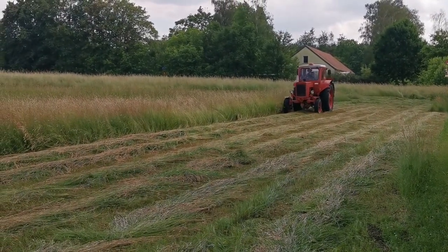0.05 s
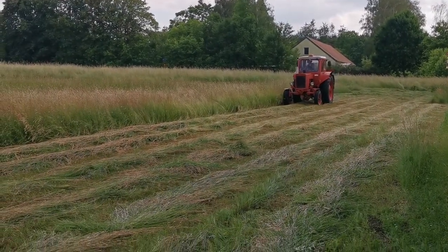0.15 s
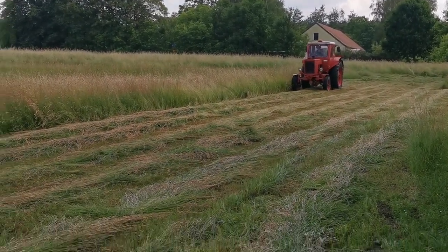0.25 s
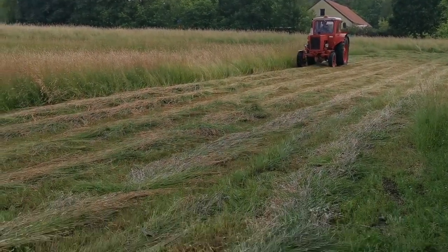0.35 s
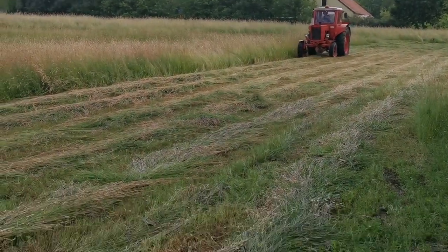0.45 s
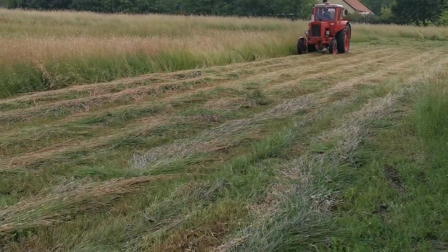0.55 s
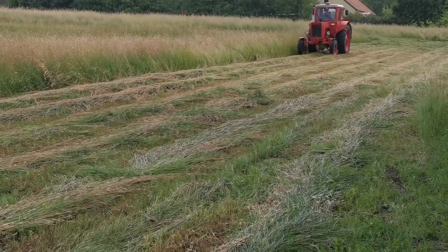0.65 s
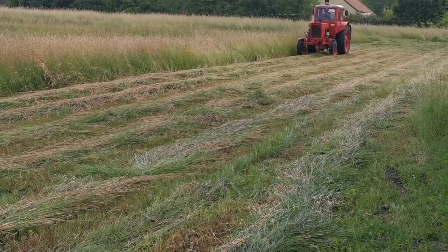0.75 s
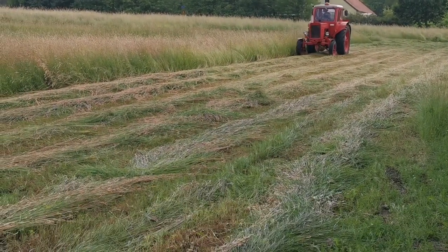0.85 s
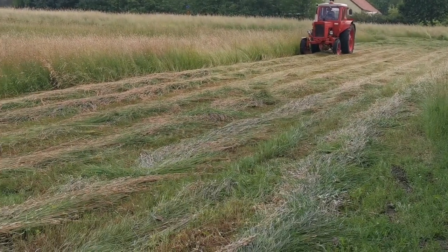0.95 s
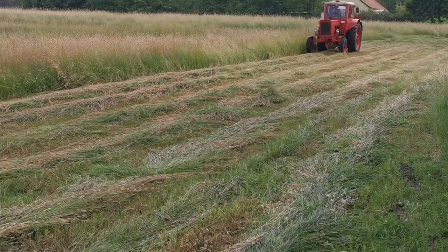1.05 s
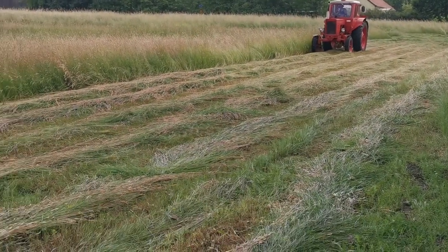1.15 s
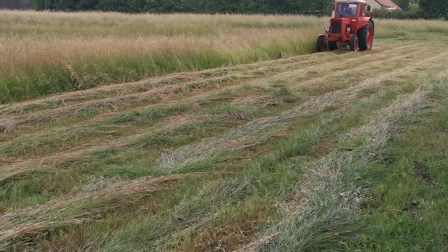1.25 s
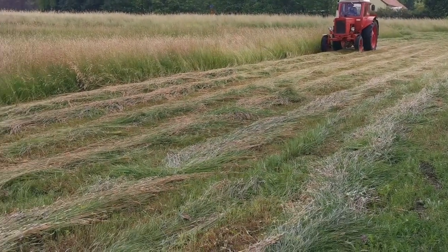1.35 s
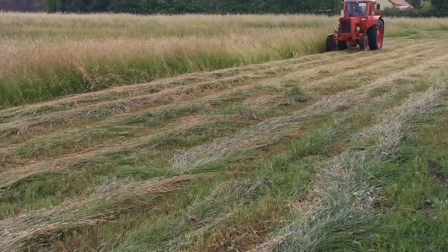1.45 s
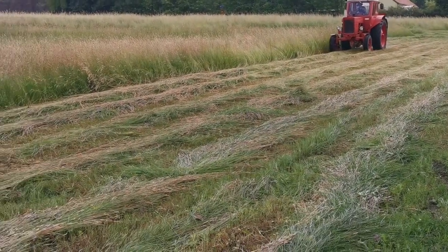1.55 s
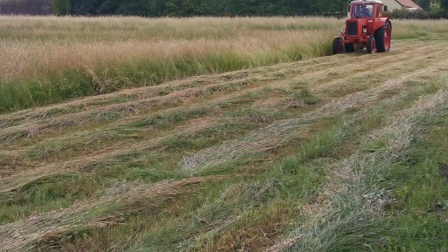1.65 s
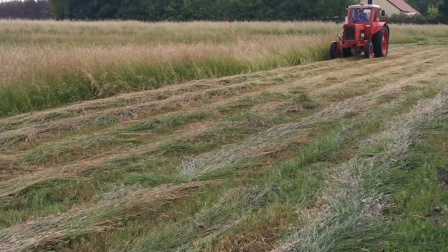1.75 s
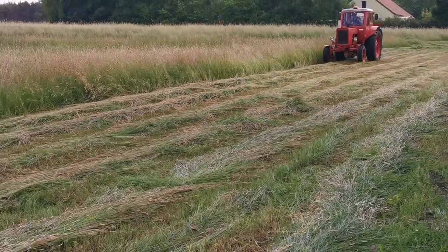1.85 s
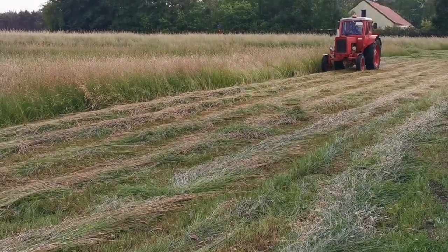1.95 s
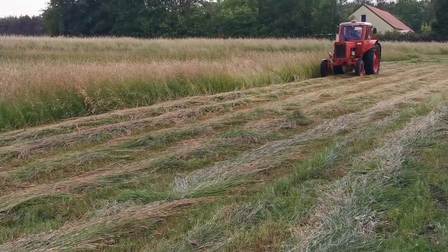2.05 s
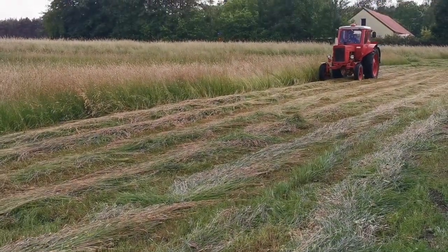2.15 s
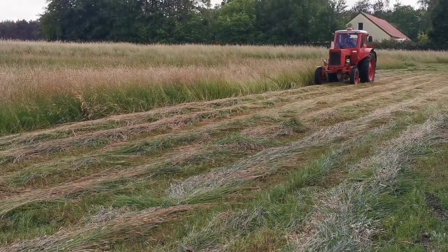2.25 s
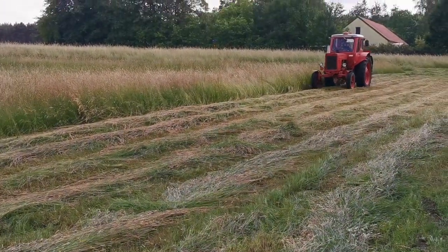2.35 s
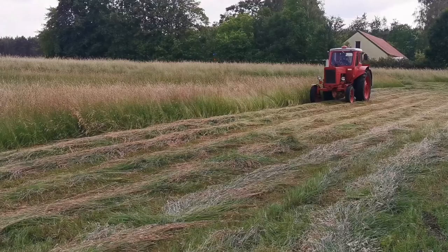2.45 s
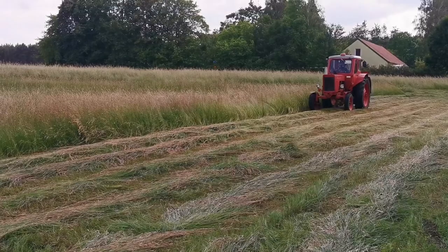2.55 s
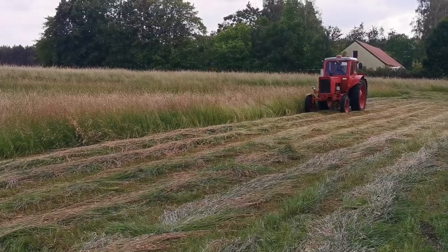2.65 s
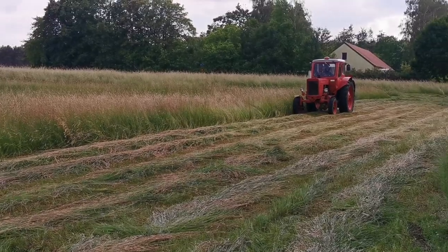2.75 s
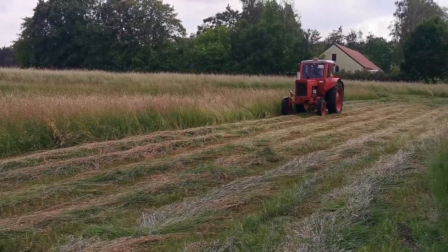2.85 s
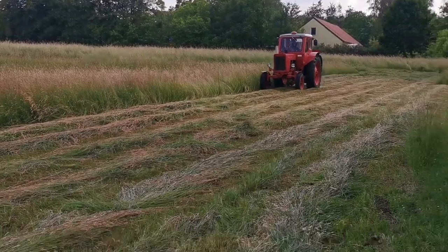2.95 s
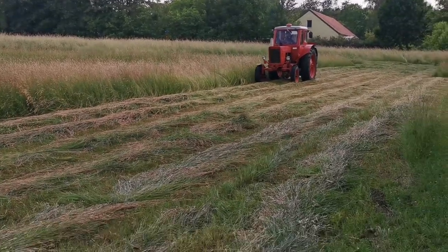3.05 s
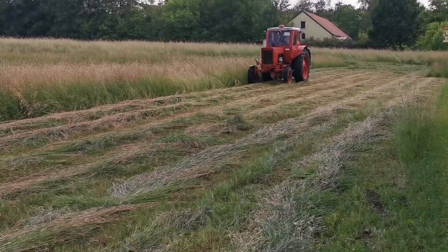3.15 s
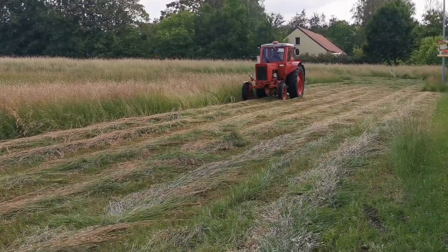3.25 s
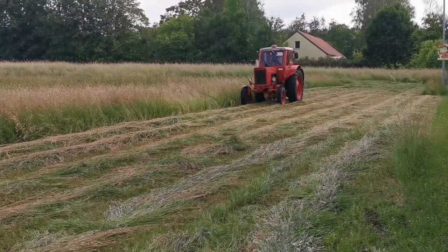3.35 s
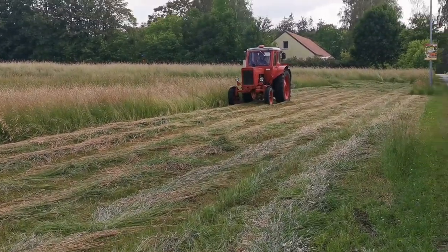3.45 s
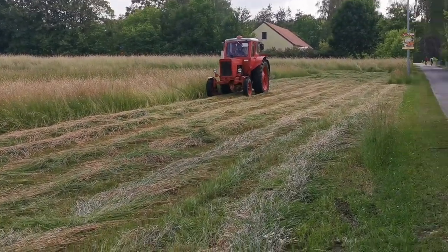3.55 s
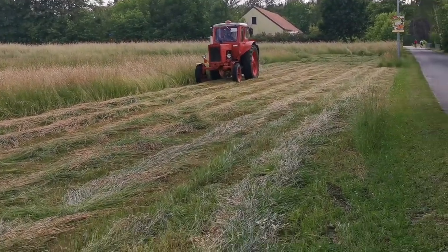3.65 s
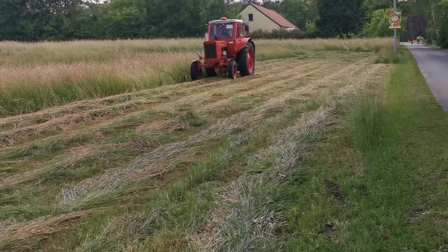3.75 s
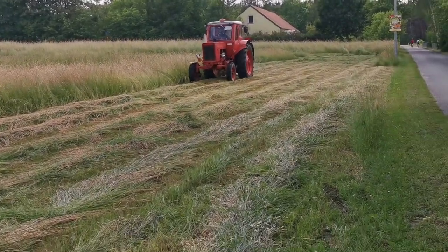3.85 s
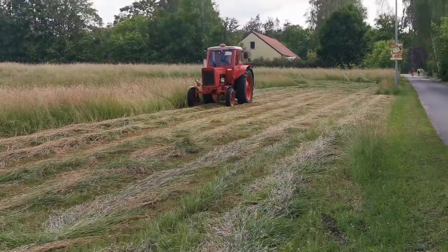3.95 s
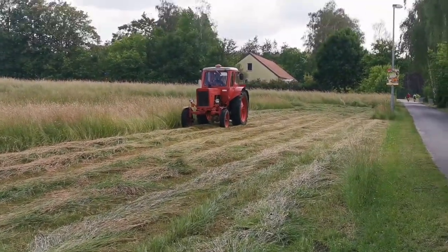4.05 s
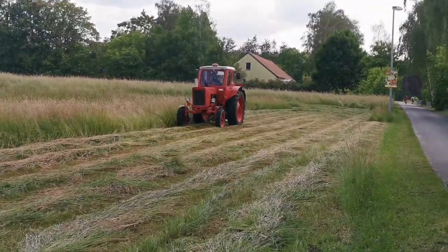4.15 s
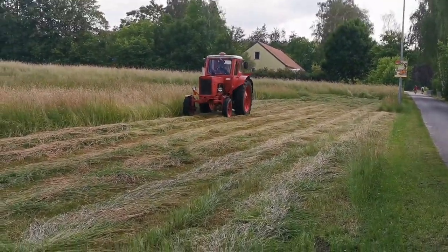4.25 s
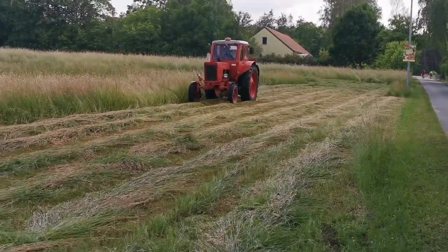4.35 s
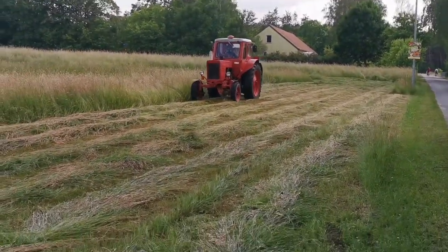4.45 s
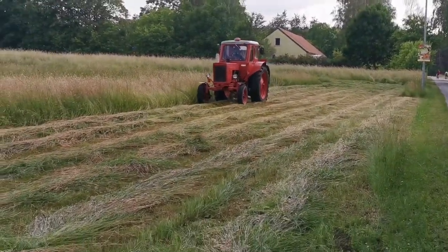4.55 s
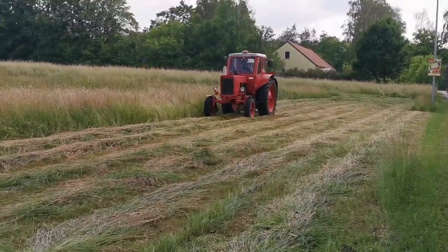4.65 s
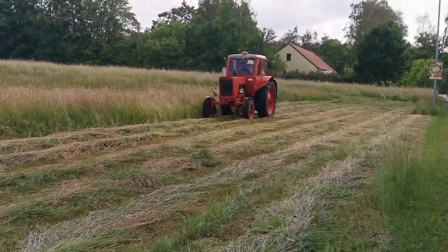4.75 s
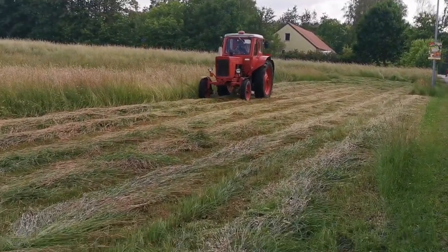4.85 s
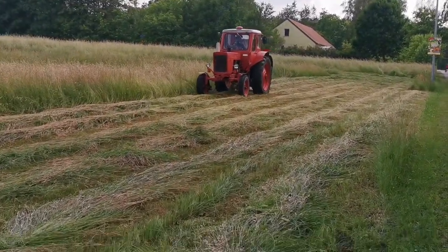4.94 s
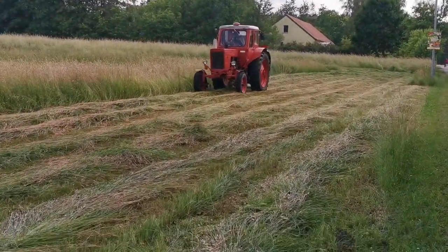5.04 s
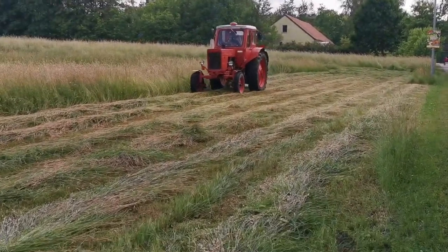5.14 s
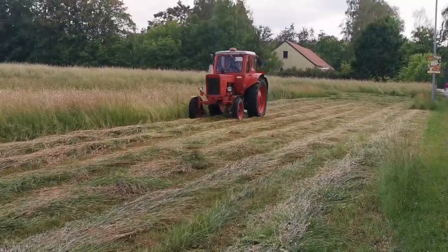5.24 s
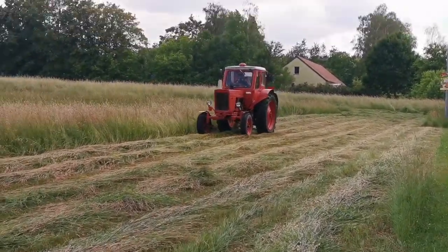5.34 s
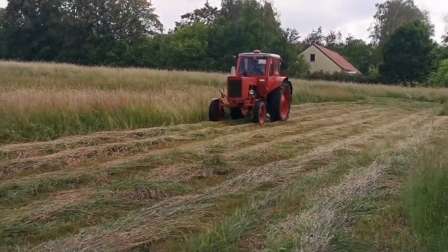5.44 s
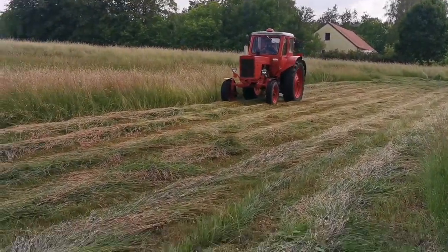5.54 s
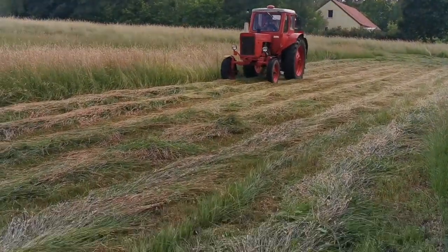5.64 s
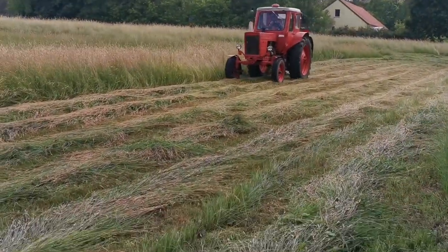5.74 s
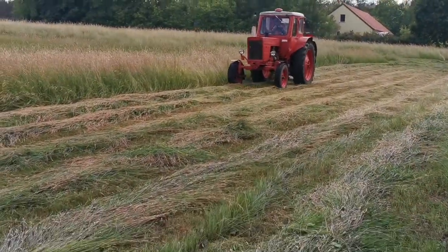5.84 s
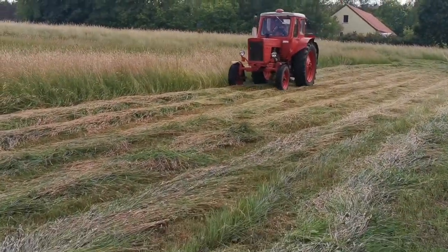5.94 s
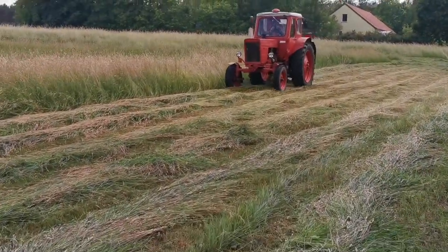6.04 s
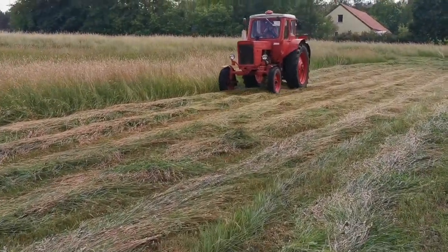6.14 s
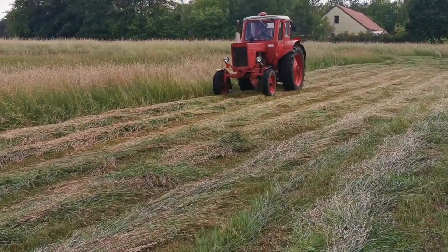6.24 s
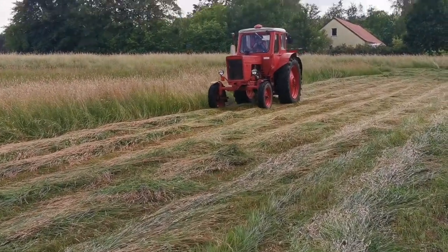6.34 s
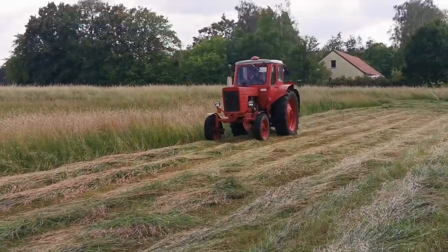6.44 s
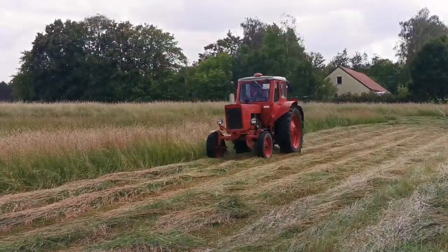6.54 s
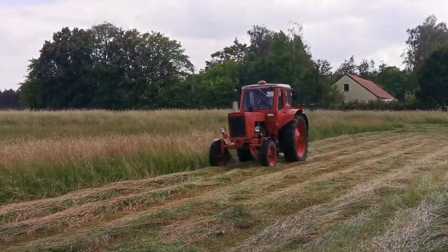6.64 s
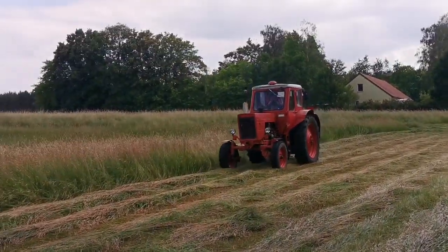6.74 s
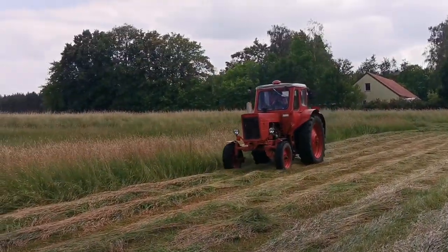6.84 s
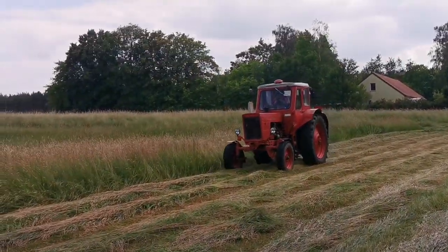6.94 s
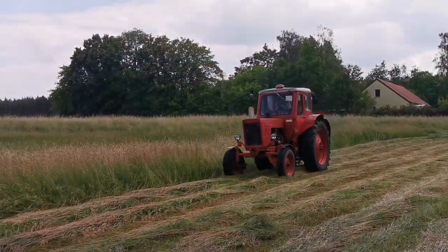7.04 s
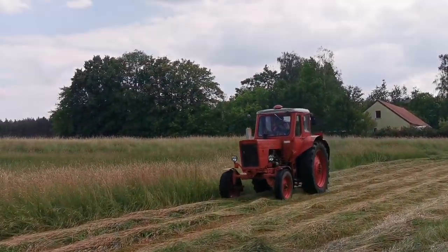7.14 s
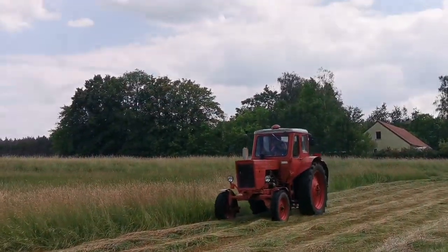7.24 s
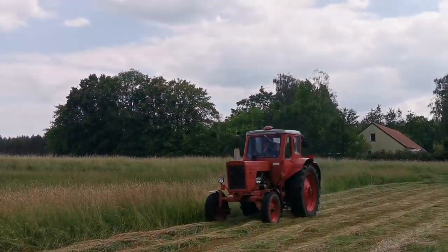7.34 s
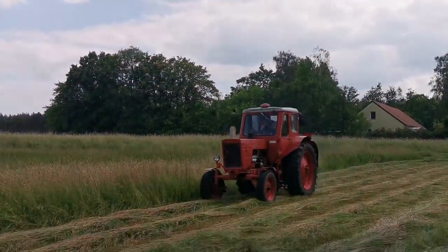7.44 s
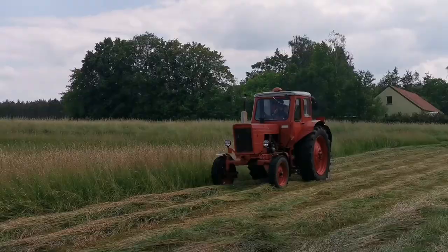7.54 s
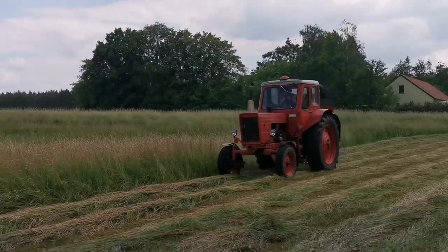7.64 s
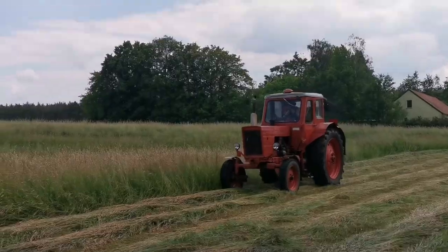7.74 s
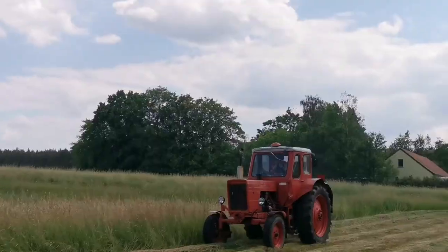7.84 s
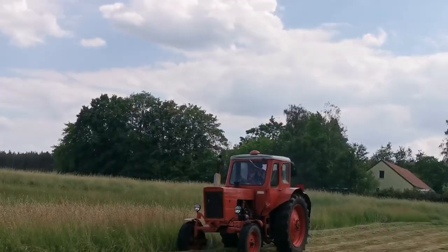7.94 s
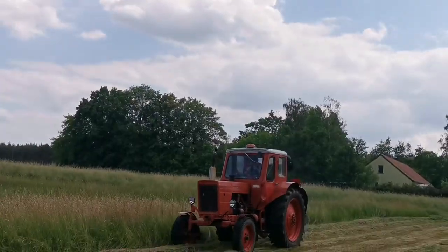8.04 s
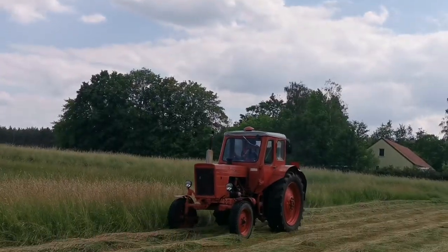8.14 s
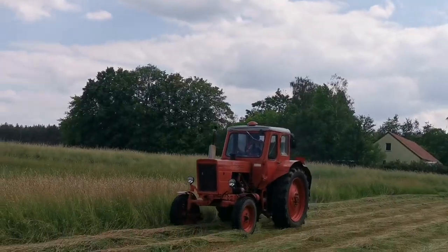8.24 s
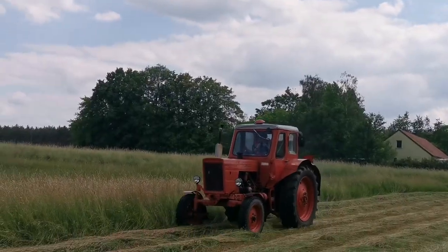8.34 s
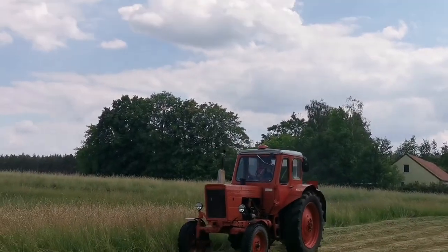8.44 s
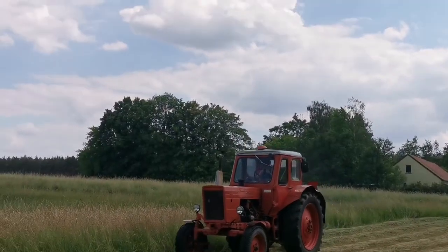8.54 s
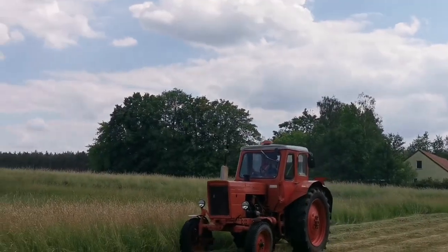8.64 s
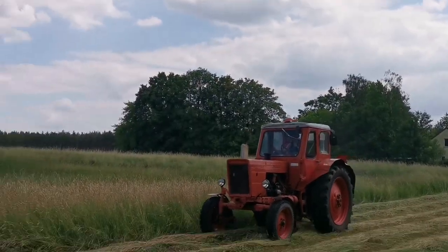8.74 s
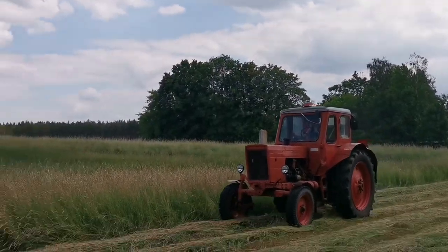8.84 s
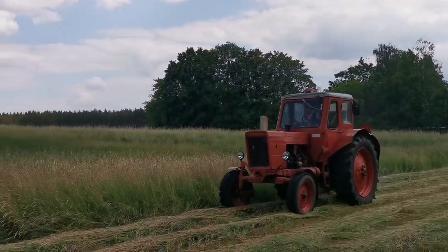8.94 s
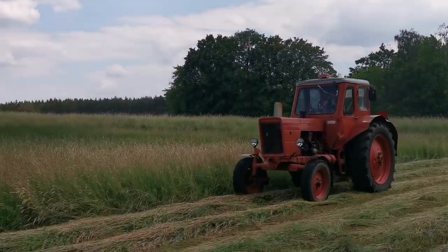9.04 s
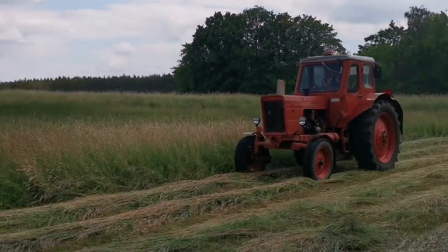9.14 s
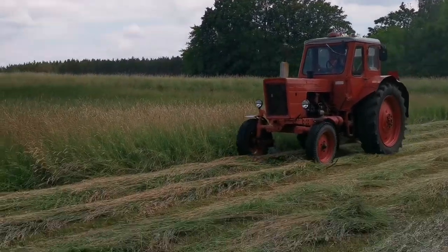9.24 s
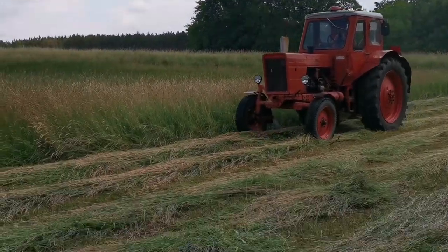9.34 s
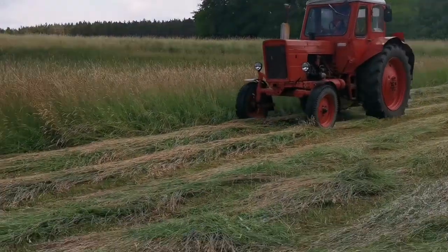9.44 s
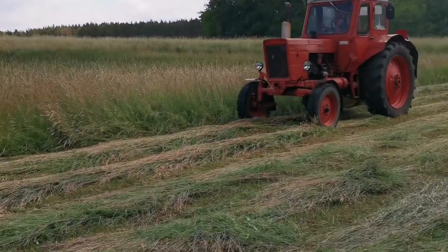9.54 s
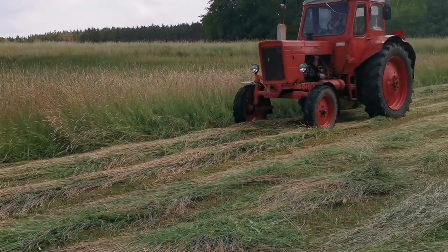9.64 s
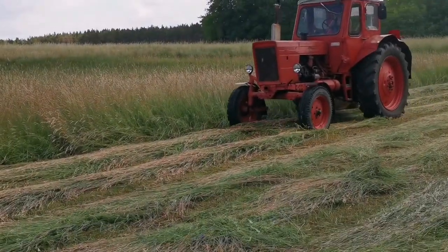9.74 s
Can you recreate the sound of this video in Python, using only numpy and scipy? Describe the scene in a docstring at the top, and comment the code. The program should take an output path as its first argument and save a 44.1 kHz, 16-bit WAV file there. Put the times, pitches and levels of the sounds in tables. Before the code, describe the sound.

An old four-cylinder diesel is already running and comes steadily nearer over mown grass. Low exhaust drone and gassy rumble dominate, with uneven knocking from the engine block, thin gear tones and two unsteady hums from the rotary mower. Airy hiss pulses with the knocks. Occasional millisecond crackles of stalks or grit cluster around seven seconds. Dry open air, handheld stereo microphone at the field edge, tone shifting as it turns, loudest at the end.

```python
"""Hay field: a four-cylinder diesel tractor with a rotary mower drives towards two microphone ports.
Exhaust: harmonics of the firing rate over a noise rumble. Block: patchy noise, struck modes, gear whines.
Fan and cut grass: patchy hiss that flares at each knock. Snapping stalks: short noise cracks.
Mower drive: two hums. The ports turn to follow, so block and hiss change colour with approach and bearing."""
import sys
import numpy as np
from scipy import signal
from scipy.fft import rfft, irfft, next_fast_len
from scipy.io import wavfile
from scipy.ndimage import uniform_filter1d, map_coordinates

SR = 44100
rng = np.random.default_rng(int(sys.argv[2]) if len(sys.argv) > 2 else 0)


def to_wav(sig):
    """Store sig (one row per channel, or 1-D mono) as 16-bit WAV at the path in sys.argv[1].

    Samples outside -1..1 are clipped; the rate is SR.
    """
    pcm = np.clip(np.atleast_2d(sig), -1, 1) * 32767
    pcm = np.round(pcm).astype(np.int16)
    wavfile.write(sys.argv[1], SR, pcm.T)  # frames by channels


N = 431738

# Firing rate as heard, dipping under load and falling as the tractor draws close: time_s, firing_hz
FIRING_RATE = [(0.0, 55.93), (1.29, 55.67), (2.38, 55.68), (2.76, 55.39), (4.45, 55.84), (5.74, 55.8),
               (6.03, 55.84), (8.01, 55.54), (8.4, 55.63), (9.79, 55.34)]
# Exhaust tones at 10 m: time_s, firing_level_db, octave_level_db
EXHAUST_10M = [(0, -28, -26), (.85, -27.5, -27), (2.3, -28.5, -25.5), (2.95, -26, -27), (4.0, -29.5, -26.5),
               (4.7, -30, -28), (6.0, -29.5, -28.5), (6.7, -31, -23.5), (6.95, -30, -29.5), (7.9, -28, -26),
               (8.4, -30, -29), (9.3, -29.5, -26.5), (9.79, -30.5, -27.5)]
# Weaker cycle harmonics from unequal cylinders: cycle_multiple, level_re_firing_db
UNEVEN_CYLINDERS = [(2, -21), (3, -19), (5, -16), (6, -13.5), (7, -18), (9, -18), (10, -15), (11, -16),
                    (13, -25), (14, -22), (15, -21), (17, -21), (18, -25), (19, -24)]
# Gas rumble spectrum in the stack: frequency_hz, gain_db
STACK_RUMBLE = [(15, -36), (30, -19), (60, -4.5), (120, -3), (190, 1.5), (260, -1.5), (320, -20),
                (400, -29.5)]
# Block and hiss noise at 10 m: time_s, clatter_level_db, hiss_level_db
NOISE_10M = [(0, -26, -36.5), (1.25, -26.5, -35), (1.5, -27, -37), (1.8, -26, -34.5), (2.25, -25, -38),
             (2.45, -25, -38.5), (2.9, -25.5, -39), (3.2, -25, -37), (3.8, -25.5, -35.5), (4.5, -25, -33),
             (5.5, -24.5, -35), (6.45, -25.5, -35), (6.75, -25, -34.5), (6.9, -26.5, -36.5),
             (7.5, -25, -33.5), (8.1, -25, -35), (8.5, -28.5, -32.5), (9.1, -26.5, -36), (9.79, -28, -36.5)]
# Block modes: mode_hz, width_hz, level_re_noise_db, strength_cyl_1, .._2, .._3, .._4
BLOCK_MODES = [(480, 140, -27, .8, .4, .7, .9), (800, 130, -23, .5, .2, .8, .9),
               (950, 130, -24, .5, .3, .9, .5), (1180, 80, -21, .3, .4, 1.1, .4),
               (1480, 80, -22, .3, 1.1, .6, .7), (2080, 200, -20, .25, .7, 1.1, .45),
               (2500, 250, -24.5, .4, .7, .9, .5)]
# Gear whines at 55.7 Hz firing: pitch_hz, wander_hz, level_re_block_noise_db
GEARS = [(426, 2.55, -28.5), (554, 3.8, -33), (737.4, 6.22, -30), (861.5, 5.05, -26.5), (1354, 3.25, -32)]
# Stalk snaps and flung grit: start_s, peak_db (before colouring)
SNAPS = [(2.2977, -37), (3.1608, -29), (5.2244, -29), (5.3837, -33), (5.7867, -26), (5.9953, -24),
         (6.4398, -24), (6.8279, -19), (6.8374, -28), (6.8463, -26), (7.2903, -30), (7.3477, -18),
         (7.3946, -27), (7.4635, -20), (7.6194, -35), (8.5704, -32), (9.036, -21)]
# Snap spectrum: frequency_hz, gain_db
SNAP_COLOUR = [(2000, -50), (6500, -12), (9000, 3), (11000, 7), (13000, -2), (16000, -10)]
# Mower drive hums at 55.7 Hz firing: low_pitch_hz, high_pitch_hz
MOWER_HZ = (185.7, 272.0)
# Lower hum at 10 m: time_s, level_db
LOW_HUM_10M = [(0, -34), (1, -38), (2.8, -35), (4, -36), (5.1, -40), (5.45, -33.5), (6.3, -37.5),
               (7.3, -39.5), (8.4, -40.5), (9.1, -35), (9.79, -36.5)]
# Upper hum at 10 m, wavering and nearly dropping out: time_s, level_db
HIGH_HUM_10M = [(0, -46), (.25, -36), (.55, -49), (.85, -38), (1.1, -51), (1.4, -42), (1.75, -44.5),
                (2.05, -38.5), (2.47, -55), (2.65, -37), (3.05, -37.5), (3.25, -47), (3.5, -37),
                (4.5, -44.5), (5.35, -38.5), (6.5, -45.5), (7.3, -44), (7.7, -58), (8.1, -43.5),
                (9.0, -40.5), (9.25, -44), (9.79, -40)]
# Tractor path: time_s, approach_0_to_4 (block colour), bearing_0_to_4 (hiss colour)
PATH = [(0, 0, 0), (2.4, .1, .05), (2.9, .9, .9), (3.45, 1.1, 1.1), (3.8, 1.9, 1.9), (5.7, 2.1, 2),
        (6.6, 2.9, 2), (7.88, 3, 2), (8.03, 3.05, 2.95), (8.5, 3.2, 3), (9.1, 3.9, 3.1), (9.35, 3.95, 3.9),
        (9.79, 4, 4)]
# Block colours, far to alongside, shaped by ground echo and side-on view:
# frequency_hz, left_gain_db, right_gain_db
BLOCK_FAR = [(300, -8, -6.5), (354, -14, -20), (498, -15.5, -10.5), (654, -7.5, -1), (835, -3.5, -0.5),
             (932, 1, 1), (1050, -2.5, -11), (1170, -15, -6.5), (1390, -10, 3.5), (1460, 3, -2.5),
             (1740, -14, 0.5), (2050, -9, -2), (2280, -10, -2), (2844, -11.5, -6.5)]
BLOCK_COMING = [(300, -5, -4), (364, -20, -24), (500, -13, -8), (645, -8, -0.5), (800, -5.5, -0.5),
                (920, 3, 2.5), (1080, -6, -7), (1190, -14, -7), (1370, -15, 0), (1460, 5, 0.5),
                (1700, -18, -0.5), (1980, -2, -4), (2310, -14, 1), (2820, -10, -7)]
BLOCK_NEARING = [(300.7, -7.5, -7), (355, -19.5, -23), (495, -11, -6.5), (656, -6.5, -1.5), (800, -7, -1),
                 (940, -5, -7), (1070, -17, -7.5), (1230, -5.5, -4), (1400, -8.5, -0.5), (1490, -1.5, -0.5),
                 (1710, -10.5, -12), (1930, -7, 2), (2230, -2.5, -1), (3010, -26, -14)]
BLOCK_CLOSE = [(300, -6, -4), (367, -9, -12.5), (508, -4.5, 0.5), (660, 1, 6), (810, 1, 3), (986, -7.5, -5),
               (1070, -1.5, -10), (1280, -3, 7), (1330, 4, 7.5), (1494, 0, -1), (1670, -7.5, -2),
               (1930, -3.5, -1), (2320, -7, 0), (2798, -4, -3.5)]
BLOCK_BESIDE = [(300, -4, -3.5), (370, -12, -12), (507, -5, -5), (640, -3.5, -2), (796, 0, 1),
                (950, -7.5, -4), (1060, -1.5, -12), (1180, -2, 2), (1300, 2, -39), (1470, -9, -4),
                (1740, -5, -16), (2010, -3, -18), (2280, -5.5, 0), (2860, -15, -12.5)]
# Hiss colours by bearing: frequency_hz, left_gain_db, right_gain_db
HISS_FAR = [(2940, -19, -1.5), (3400, -7, -3), (4200, -11.5, -11), (5030, -14, -10), (5900, -21, -4.5),
            (6500, -5.5, -8.5), (7300, -9, -18), (8300, -12, -11.5), (9200, -15, -6), (10300, -33, -9),
            (11200, -30, -14.5), (12300, -33, -24), (13500, -26, -13), (15500, -31, -17)]
HISS_COMING = [(2850, -5, -4), (3400, -8, 0.5), (4230, -10, -4), (5000, -16, -11), (5800, -11, -8),
               (6500, -11, -14), (7300, -11, -10), (8300, -1.5, -7), (9300, -12, -7.5), (10600, -20, -3),
               (11200, -25, -14), (12300, -26, -20), (13500, -25, -11), (15500, -28, -15)]
HISS_NEARING = [(2910, 0.5, -4), (3400, -9.5, -4.5), (4330, -11.5, -10), (4920, -4, -7), (5900, -6.5, -21),
                (6450, -17, -7.5), (7000, -8.5, -3.5), (8550, -6.5, 1.5), (9300, -8, 0), (10440, -25, -0.5),
                (10980, -26, -0.5), (11800, -22, -13.5), (13500, -18, -8.5), (15500, -15, -25)]
HISS_CLOSE = [(2720, 3.5, 0), (3380, -9, -2), (4300, -13, -2.5), (4860, -7, -3.5), (5600, -7.5, -23),
              (6660, -4, -5), (7160, -4, -31), (8300, -15, -12), (9300, -15, -15), (10400, -23, -10),
              (11000, -27, -9), (12200, -30, -22), (13500, -22, -15), (15300, -25, -23)]
HISS_BESIDE = [(2860, 2, -2), (3380, -14, 1.5), (4200, -3, 0), (4930, -3.5, 3), (5800, -1, -13),
               (6500, -9, -2.5), (7350, -8, -10), (8200, -20, -15), (9100, -24, -13), (10300, -10, -17),
               (11200, -18, -12), (12300, -21.5, -6), (13500, -15.5, -11), (15500, -18, -20)]
# Left port delay: time_s, left_lag_s
LEFT_LAG = [(0, .00005), (2, .00007), (3.5, -.00002), (5.5, -.00001), (7.3, .00003), (7.8, .00009),
            (8.7, .0001), (9.2, .00018), (9.79, .00018)]
# Left-right likeness of noise: frequency_hz, correlation
LIKENESS = [(100, .998), (640, 0.96), (1400, 0.87), (2500, 0.8), (3500, 0.42), (9000, 0.4), (15000, .25)]

BLOCK_COLOURS = (BLOCK_FAR, BLOCK_COMING, BLOCK_NEARING, BLOCK_CLOSE, BLOCK_BESIDE)
HISS_COLOURS = (HISS_FAR, HISS_COMING, HISS_NEARING, HISS_CLOSE, HISS_BESIDE)
SPEED_M_S, REACH_S = 2.5, 13.2  # steady approach; time at which it would reach the ports
STRONGEST_KNOCK_S, REFERENCE_FIRING_HZ = 4.49, 55.7
FLARE_RISE_S, SNAP_RISE_S, IGNITION_JITTER_S = .0028, .0006, .00008
TOP_HZ = 15830


def exhaust():
    """Four puffs a cycle, one stronger, a sixth of a cycle after its knock; gas rumbles in the stack."""
    firing_db, octave_db = curves(EXHAUST_10M) + nearness_db()
    cycle = 2 * np.pi * (crank_cycles() - .167)
    firing = 4 * cycle
    tones = amp(firing_db + .9 * wobble(8)) * np.cos(firing - .62)
    tones += amp(octave_db + 1.3 * wobble(12)) * np.cos(2 * firing + .27)
    tones += amp(firing_db - 14.5 + 1.5 * wobble(2.5)) * np.cos(3 * firing + .5)
    for multiple, level_db in UNEVEN_CYLINDERS:
        # The stack holds higher multiples back, blunting the strong puff.
        phase = multiple * cycle - .012 * multiple ** 2 + .4 * wobble(3)
        tones += amp(firing_db + level_db + 2.2 * wobble(3)) * np.cos(phase)
    gas = partly_alike(patchy(depth_db=2.0))
    rumble = unit(filtered(gas, lambda hz: amp(along(STACK_RUMBLE, hz))))
    balance = amp([[1.6], [-1.6]])
    return (np.sqrt(2) * tones + amp(firing_db - 9.3) * rumble) * balance


def machinery():
    """Block clatter, knocks and gear whines take one port colour; hiss and snaps take another."""
    clatter_db, hiss_db = curves(NOISE_10M) + nearness_db()
    approach, bearing = (np.clip(c, 0, 4) for c in curves(PATH))
    ring, flare = knocking()
    block = partly_alike(patchy(depth_db=1.26)) + ring + gear_whines()
    block = amp(clatter_db + .87 * wobble(7)) * block
    hiss = amp(hiss_db + .41 * wobble(9)) * flare * partly_alike(patchy(depth_db=1.33))
    return ports(block, BLOCK_COLOURS, approach) + ports(hiss + snaps(), HISS_COLOURS, bearing)


def knocking():
    """Firings strike the block's modes, alike from cycle to cycle, and make the hiss flare for milliseconds."""
    firing = np.floor(4 * crank_cycles()).astype(int)
    at = np.flatnonzero(np.diff(firing)) + 1
    cylinder = (firing[at] + 2) % 4
    jitter = np.round(IGNITION_JITTER_S * SR * rng.standard_normal(len(at))).astype(int)
    at = np.clip(at + jitter, 0, N - 1)

    def blows(strength, scatter_db):
        train = np.zeros(N)
        train[at] = np.array(strength)[cylinder] * amp(scatter_db * rng.standard_normal(len(at)))
        return train

    ring = 0
    for mode_hz, width_hz, level_db, *strength in BLOCK_MODES:
        def resonance(hz):
            damping = 1j * hz * width_hz
            return (damping / (mode_hz ** 2 - hz ** 2 + damping)) ** 2
        ring = ring + amp(level_db) * unit(filtered(blows(strength, 1.8), resonance))
    t = np.arange(SR // 50) / (SR * FLARE_RISE_S)
    flare = np.convolve(blows([.41, .16, .32, .16], 3.4), t * np.exp(1 - t))[:N]
    return ring, 1 + flare


def gear_whines():
    """Gear mesh tones that follow the firing rate, wandering in pitch and level."""
    whines = 0
    for pitch_hz, wander_hz, level_db in GEARS:
        mesh_hz = pitch_hz * firing_ratio() + wander_hz * wobble(25)
        whines = whines + amp(level_db + 2.8 * wobble(6)) * tone(mesh_hz)
    return whines


def snaps():
    """Stalks and grit: millisecond noise cracks, bright only."""
    out = np.zeros(N + SR)
    t = np.arange(SR // 50) / (SR * SNAP_RISE_S)
    for start_s, peak_db in SNAPS:
        crack = t * t * np.exp(-2 * t) * rng.standard_normal(len(t))
        start = round((start_s + SNAP_RISE_S) * SR)
        out[start:][:len(t)] += amp(peak_db) * crack / abs(crack).max()
    return filtered(out[:N], lambda hz: amp(along(SNAP_COLOUR, hz)[0]))


def mower():
    """Two unsteady hums of the mower drive, geared to the engine."""
    hums = 0
    for pitch_hz, level_db in zip(MOWER_HZ, curves(LOW_HUM_10M) + curves(HIGH_HUM_10M)):
        level = amp(level_db + nearness_db() + wobble(7))
        hums = hums + level * tone(pitch_hz * firing_ratio() + .59 * wobble(8))
    return hums * amp([[.7], [-.7]])


def crank_cycles():
    """Four-stroke cycles as heard, four firings each; whole at knocks of the strongest cylinder."""
    turns = np.cumsum(curves(FIRING_RATE)[0]) / (4 * SR)
    return turns - turns[round(STRONGEST_KNOCK_S * SR)]


def firing_ratio():
    """Firing rate as heard, relative to the reference rate."""
    return curves(FIRING_RATE)[0] / REFERENCE_FIRING_HZ


def nearness_db():
    """Spherical spreading: level gained over 10 m as distance shrinks."""
    distance_m = SPEED_M_S * (REACH_S - np.arange(N) / SR)
    return -20 * np.log10(distance_m / 10)


def ports(x, colours, stage):
    """Glides between port colours and delays the left port; white noise keeps rms 1."""
    hz, s, spectrum = signal.stft(x, SR, nperseg=1024)
    # Close both band edges at -70 dB.
    closed = [[(c[0][0] * .75, -70, -70)] + list(c) + [(c[-1][0] * 1.15, -70, -70)] for c in colours]
    frame_stage = stage[np.minimum(s * SR, N - 1).astype(int)]
    weight = np.clip(1 - abs(frame_stage - np.arange(len(colours))[:, None]), 0, 1)
    gain = amp(np.einsum("kcf,kt->cft", [along(c, hz) for c in closed], weight))
    lag_s = np.interp(s, *np.transpose(LEFT_LAG))
    # Half the lag on each port, with opposite signs.
    gain = gain * np.exp(np.pi * 1j * np.multiply.outer(np.outer([-1, 1], hz), lag_s))
    gain /= np.sqrt(np.mean(abs(gain) ** 2, axis=(0, 1)))
    return signal.istft(spectrum * gain, SR, nperseg=1024)[1][:, :N]


def patchy(depth_db):
    """Two unrelated noises sharing patches of random gain, so that they flutter unevenly."""
    spectrum = signal.stft(rng.standard_normal((2, N)), nperseg=512)[2]
    field = rng.standard_normal(spectrum.shape[1:])
    field = uniform_filter1d(field, size=4, axis=0)
    field = uniform_filter1d(field, size=16, axis=1)
    return signal.istft(spectrum * amp(depth_db * unit(field)), nperseg=512)[1][:, :N]


def partly_alike(pair):
    """Mixes two unrelated signals to the likeness of the two ports."""
    def mid_side(hz):
        angle = np.arccos(np.clip(along(LIKENESS, hz)[0], -1, 1)) / 2
        return np.array([np.cos(angle), np.sin(angle)])
    mid, side = filtered(pair, mid_side)
    return np.array([mid + side, mid - side])


def tone(hz):
    """Sine of rms 1 that follows hz."""
    return np.sqrt(2) * np.sin(2 * np.pi * (np.cumsum(hz * np.ones(N)) / SR + rng.random()))


def wobble(rate_hz):
    """Smooth random curve with rate_hz knots a second."""
    knots = rng.standard_normal(int(N * rate_hz / SR) + 4)
    return map_coordinates(knots, [np.arange(N) * rate_hz / SR])


def filtered(x, response):
    """Applies a complex response of frequency."""
    size = next_fast_len(N + 8192)
    return irfft(rfft(x, size) * response(np.fft.rfftfreq(size, 1 / SR)), size)[..., :N]


def curves(rows):
    """One value per sample for each column after time_s."""
    s, *columns = np.transpose(rows)
    return [np.interp(np.arange(N) / SR, s, c) for c in columns]


def along(rows, hz):
    """Columns after frequency_hz, interpolated on a log frequency axis."""
    f, *columns = np.transpose(rows)
    return np.array([np.interp(np.log(hz + 1), np.log(f + 1), c) for c in columns])


def amp(db):
    """Gain of a level in dB."""
    return 10 ** (np.asarray(db) / 20)


def unit(x):
    """x brought to rms 1."""
    return x / np.sqrt(np.mean(x ** 2) + 1e-20)


def scene():
    """Everything at the two ports."""
    return exhaust() + machinery() + mower()


def record(dry):
    """Keeps nothing at or above the band limit."""
    return filtered(dry, lambda hz: hz < TOP_HZ)


dry = scene()
out = record(dry)
to_wav(out)
```